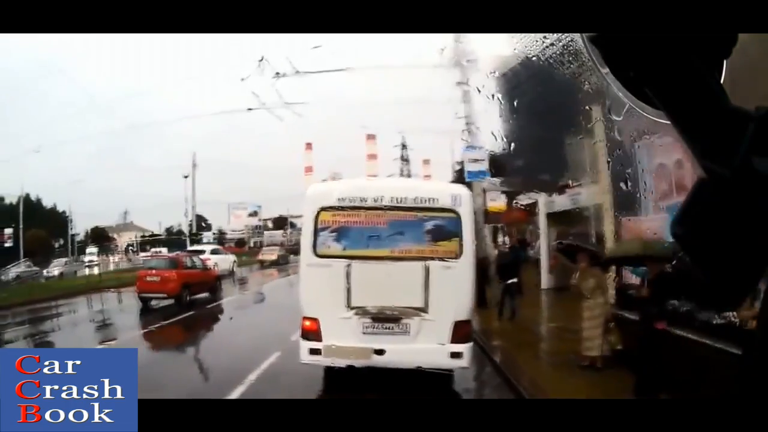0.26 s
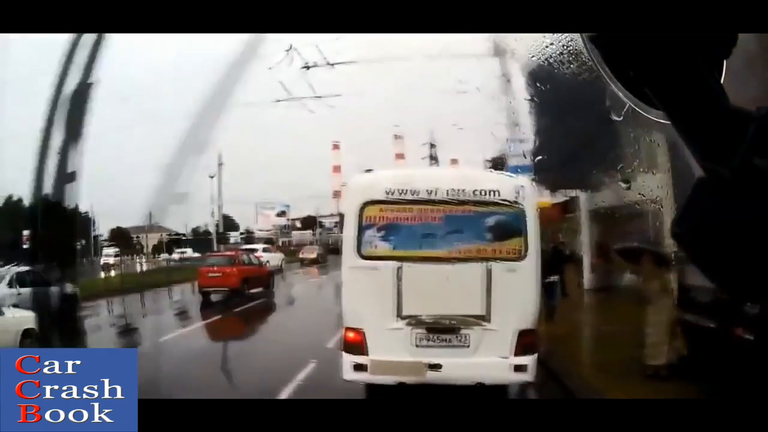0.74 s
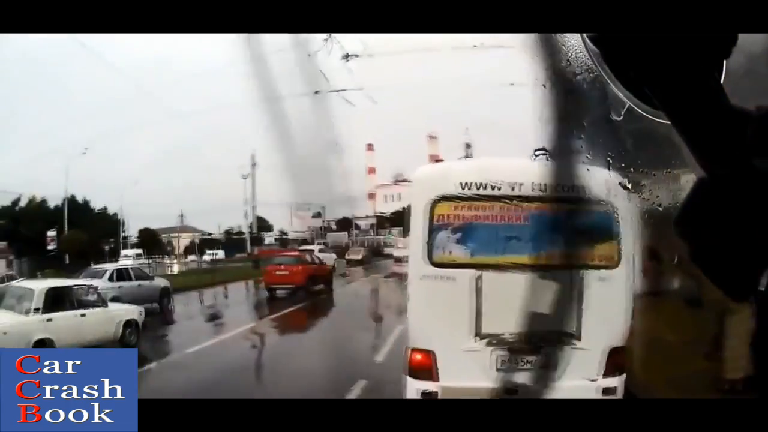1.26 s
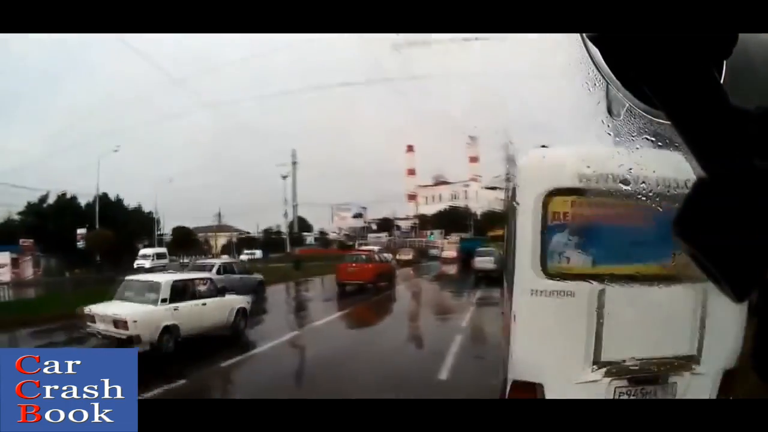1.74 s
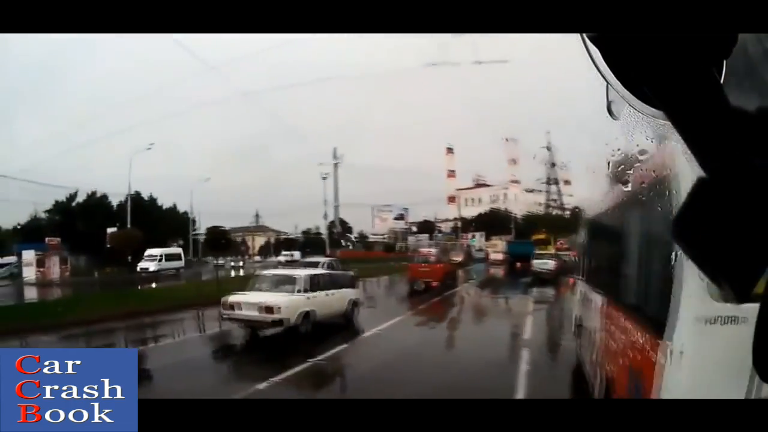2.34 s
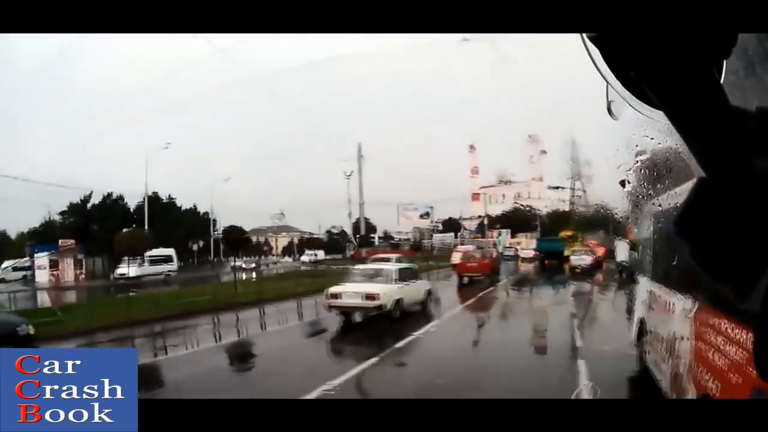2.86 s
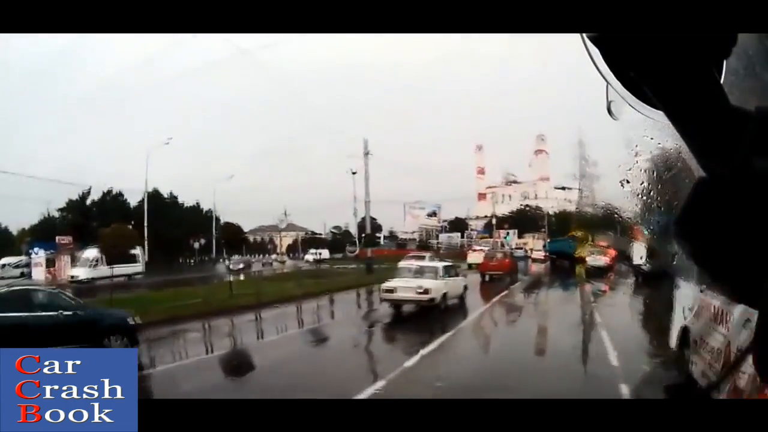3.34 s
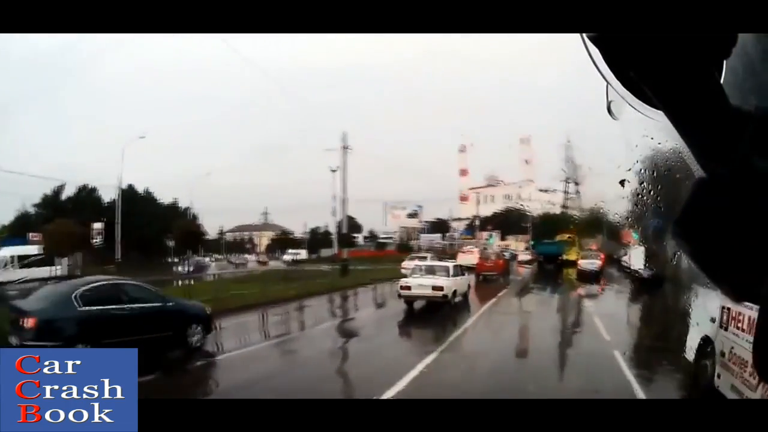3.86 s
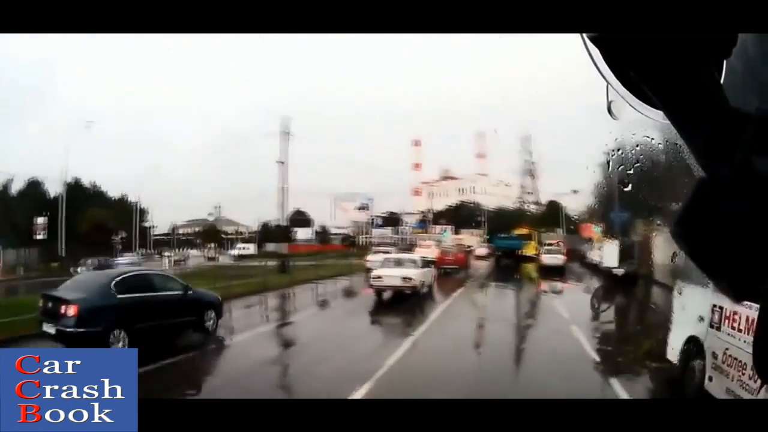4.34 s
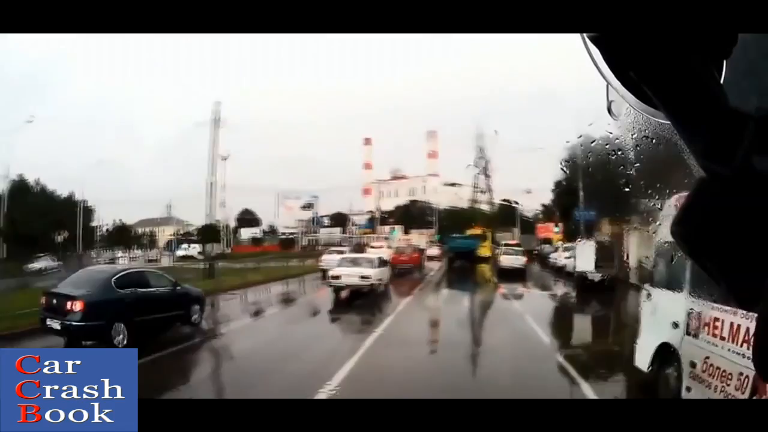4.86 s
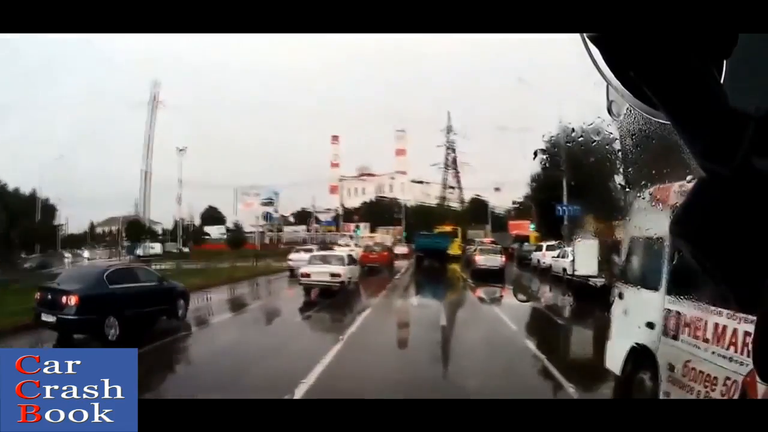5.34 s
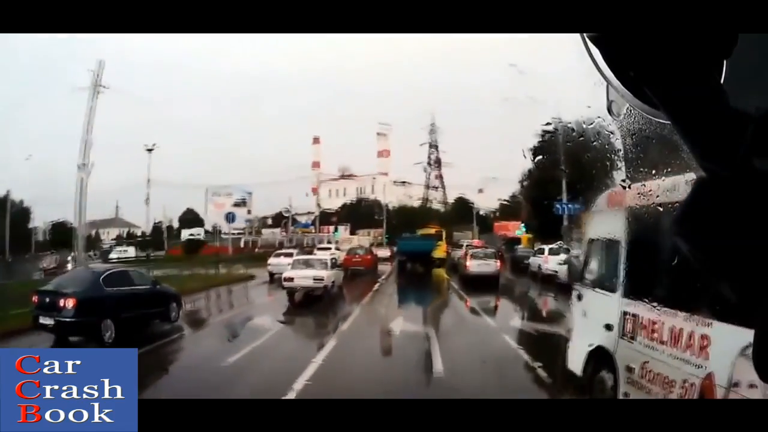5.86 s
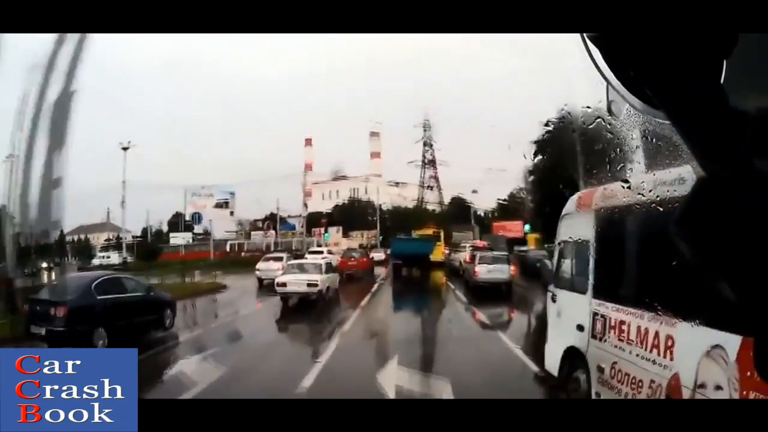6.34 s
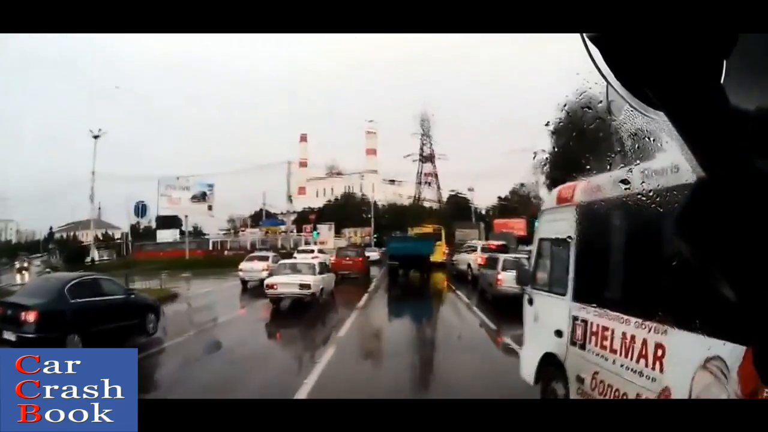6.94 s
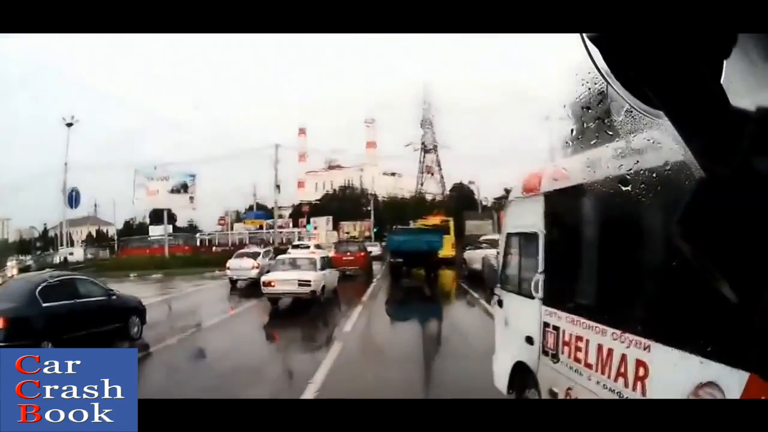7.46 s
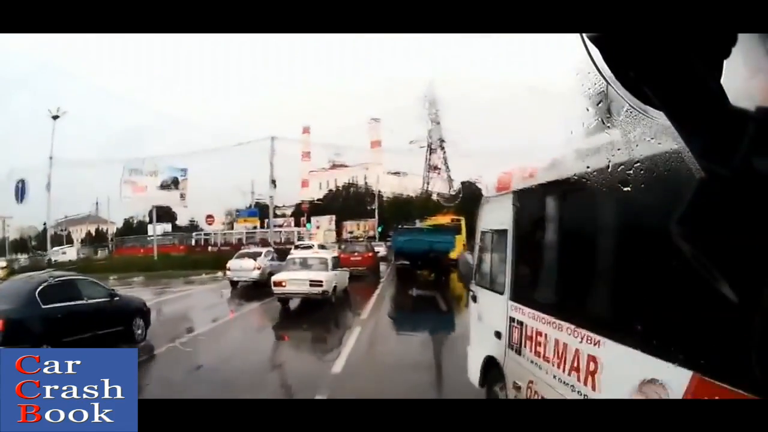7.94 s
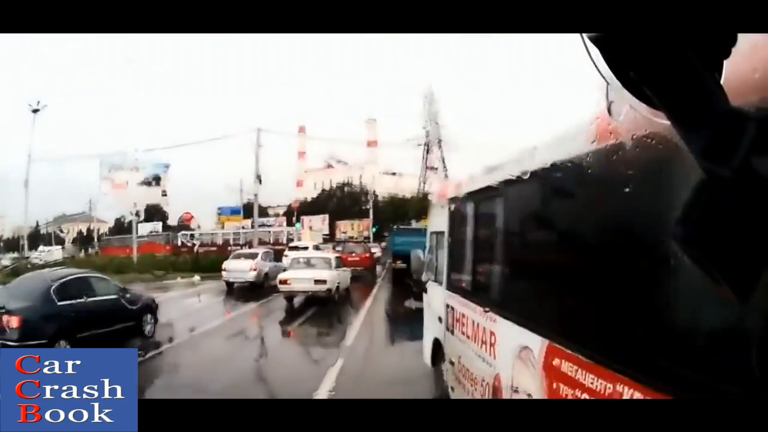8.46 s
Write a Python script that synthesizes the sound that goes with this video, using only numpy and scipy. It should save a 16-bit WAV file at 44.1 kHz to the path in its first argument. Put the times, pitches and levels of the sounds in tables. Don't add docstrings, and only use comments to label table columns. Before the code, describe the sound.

Boomy car cabin on a rainy road: engine climbing and falling, soft splashes and ticks, ending in hard jolts and a long dissonant horn blast.

```python
import sys
import numpy as np
from scipy import signal
from scipy.fft import rfft, irfft, next_fast_len
from scipy.io import wavfile
from scipy.ndimage import uniform_filter1d

SR = 44100
rng = np.random.default_rng(int(sys.argv[2]) if len(sys.argv) > 2 else 0)


def transcribe(u):
    v = np.clip(np.atleast_2d(u).T, -1, 1)
    q = np.round(v * 32767).astype(np.int16)
    wavfile.write(sys.argv[1], SR, q)


def ratio_of_db(decibels):
    return 10 ** (np.asarray(decibels, float) / 20)


N = 384111
T = np.arange(N) / SR


def curves(table):
    s, *columns = np.transpose(table)
    return [np.interp(T, s, c) for c in columns]


def unit(x):
    return x / np.sqrt(np.mean(x ** 2))


def walk(rate):
    k = int(SR / rate)
    steps = np.repeat(rng.standard_normal(N // k + 1), k)
    return unit(uniform_filter1d(uniform_filter1d(steps, k), k)[:N])


def ring(x, hz, width_hz):
    return signal.lfilter(*signal.iirpeak(hz, hz / width_hz, SR), x)


def soften(x, hz, order=2):
    return signal.sosfilt(signal.butter(order, hz, fs=SR, output="sos"), x)


def thin(x, hz):
    return signal.sosfilt(signal.butter(4, hz, "high", fs=SR, output="sos"), x)


def cut_steeply(x, hz, order, ripple_db, depth_db):
    return signal.sosfilt(signal.ellip(order, ripple_db, depth_db, hz, fs=SR, output="sos"), x)


def band(lo_hz, hi_hz, order=3):
    edges = signal.butter(order, [lo_hz, hi_hz], "band", fs=SR, output="sos")
    return unit(signal.sosfilt(edges, rng.standard_normal(N)))


def hiss(tone, flicker_db, rate):
    hz, db = np.transpose(tone)
    n = next_fast_len(N, True)
    f = np.arange(n // 2 + 1) * SR / n + 1
    tilt = ratio_of_db(np.interp(np.log(f), np.log(hz), db, left=-90, right=-90))
    whole = rfft(rng.standard_normal(n)) * tilt
    out, shared = 0, walk(rate)
    for centre in np.arange(2 * np.log2(hz[0]), 2 * np.log2(hz[-1]) + 1):
        part = whole * np.clip(1 - np.abs(2 * np.log2(f) - centre), 0, 1)
        out = out + irfft(part, n)[:N] * ratio_of_db(flicker_db * (shared + 0.21 * walk(rate)))
    return unit(out)


def stack(hz, tones, waver_db, rate, in_step_s=None):
    turn, spread = 2 * np.pi * np.cumsum(hz) / SR, 2 * np.pi
    if in_step_s is not None:
        turn, spread = turn - turn[int(in_step_s * SR)], 0
    partials = (ratio_of_db(db + waver_db * walk(rate)) * np.sin(k * turn + spread * rng.random()) for k, db in tones)
    return np.sqrt(2) * sum(partials)


def strikes(rows):
    out, t = np.zeros(N + SR), T[:SR // 4]
    for s, db, hz, t60, share, width in rows:
        noise = ring(ring(rng.standard_normal(len(t)), hz, hz * width), hz, hz * width)
        knock = np.sin(2 * np.pi * hz * t) + share * unit(noise)
        decay = np.exp(-np.log(1000) * t / t60)
        out[int(s * SR):][:len(t)] += ratio_of_db(db) * knock * decay * np.minimum(t / 0.00027, 1)
    return out[:N]


def hold(start, end, attack, release, depth_db=-30):
    db = depth_db * (np.clip(1 - (T - start) / attack, 0, 1) + np.clip((T - end) / release, 0, 3))
    return ratio_of_db(db) * np.clip((T - start) / .005, 0, 1)


def swells(rows):
    t, rise_share = T[::32], 0.55
    bells = (ratio_of_db(db) * np.exp(-.5 * ((t - s) / spread / np.where(t < s, rise_share, 1)) ** 2)
             for s, db, spread in rows)
    return np.interp(T, t, sum(bells))


# t/s, tyre and air noise level/dB, thrown water level/dB
ROLLING = [(0.0, -42, -61), (0.75, -44, -59), (1.6, -44, -60.5), (1.9, -46, -77), (2.6, -44.5, -72),
           (3.0, -42.5, -57), (3.56, -40.5, -60), (3.78, -39.5, -56), (4.29, -37.5, -54),
           (5.09, -35.5, -57.5), (5.6, -37.5, -58.5), (6.42, -37, -53.5), (6.83, -39, -58),
           (7.34, -42, -55), (7.96, -42.5, -59), (8.56, -37.5, -65), (8.71, -41, -62)]
# f/Hz, level/dB per Hz
RUSH = [(290, 1.5), (500, 1), (620, -3), (671, -3.5), (918, -6), (1130, -11), (2720, -11.5), (3950, -29.5),
        (5200, -46), (6760, -69), (11400, -120)]
# f/Hz, level/dB per Hz
SPRAY = [(2530, -32), (4300, -5), (4980, -2), (6630, 9.5), (7890, 5), (9230, 7.5), (9780, 4.5),
         (11500, -9.5), (12500, -25.5), (16200, -58), (22000, -120)]
# t/s, level/dB, spread/s
SPLASHES = [(0.0, -50, 0.0103), (0.277, -52.5, 0.0091), (0.33, -54.5, 0.033), (0.815, -47.5, 0.033),
            (1.375, -47, 0.0287), (1.43, -54, 0.027), (1.475, -40, .015), (1.52, -46.5, 0.021),
            (2.02, -57, 0.011), (2.07, -56, .02), (2.42, -58, 0.027), (2.66, -57, .015), (2.83, -55, .03),
            (2.98, -56, 0.027), (3.06, -54.5, 0.055), (3.143, -47.5, 0.011), (3.575, -46.5, 0.012),
            (6.05, -48, 0.034), (6.918, -53, .01), (6.965, -52, 0.014)]


def wet():
    rush_db, spray_db = curves(ROLLING)
    splash = swells(SPLASHES)
    rush = hiss(RUSH, flicker_db=0.48, rate=20)
    rush = rush + .5 * ring(rush, 1755, 230) + 0.33 * ring(rush, 2680, 230)
    spray = hiss(SPRAY, flicker_db=1.1, rate=40)
    rush_level = np.hypot(ratio_of_db(rush_db + 0.5), ratio_of_db(4) * splash)
    spray_level = ratio_of_db(-4.0) * np.hypot(ratio_of_db(spray_db), splash)
    return rush_level * rush + spray_level * spray + ratio_of_db(-70.5) * band(5300, 10060)


# t/s, level/dB, spread/s, f/Hz
HUMS = [(0.6, -33, 0.231, 121), (1.13, -33, 0.057, 150), (1.88, -32.5, 0.12, 155.6), (2.4, -39, 0.17, 161),
        (2.75, -36.5, 0.1184, 141.2), (2.9, -29.5, .2, 62), (3.3, -32, 0.053, 118), (3.92, -32, 0.1, 200.5),
        (4.03, -32.5, .09, 370), (4.7, -36, .08, 320), (5.35, -35, .05, 368), (7.49, -33, .05, 603),
        (5.4, -28, 0.053, 138), (6.02, -28.5, 0.04, 155), (6.27, -27.5, 0.09, 121),
        (6.93, -32, 0.046, 140.1), (7.1, -35, 0.13, 178), (7.33, -28, 0.055, 114.4), (8.05, -35, .1, 125.5)]
# t/s, level/dB, spread/s
RUBS = [
    (0.855, -46, 0.0275),
    (1.38, -38.5, 0.029),
    (1.415, -42, .02),
    (1.442, -37.5, .012),
    (1.478, -38, 0.015),
    (1.505, -42.5, .015),
    (1.53, -39, 0.012),
]


def panels():
    hums = 0
    for s, db, spread, hz in HUMS:
        hum = ring(rng.standard_normal(N), hz, 11.74)
        hums = hums + swells([(s, db, spread)]) * unit(soften(hum, 1.98 * hz, order=4))
    rub = band(330, 2470, order=2) * ratio_of_db(3.65 * walk(130))
    rub = rub + 1.9 * ring(rub, 636, 300) + 0.28 * ring(rub, 2400, 300)
    return hums + swells(RUBS) * unit(soften(rub, 3150, order=6))


# f/Hz, width/Hz, level/dB
CABIN = [(50, 41, -11), (121, 19.8, 4), (142.3, 13, 1.5), (230.7, 26.4, 1.5), (320, 58, -1),
         (370.7, 22, -5.5), (500, 92, -32), (800, 600, -34.5)]
# t/s, level/dB, spread/s
SWAYS = [(0.63, -30.5, 0.16), (1.24, -22, .05), (1.42, -19.5, 0.087), (1.87, -27, .1), (2.31, -23.5, 0.055),
         (2.7, -27, 0.19), (3.57, -23, 0.085), (3.8, -25, 0.086), (4.3, -26, 0.19), (4.75, -23, .15),
         (5.05, -23.5, 0.081), (5.5, -19.5, .07), (5.8, -22, 0.11), (6.5, -25, 0.29), (6.86, -19, 0.088),
         (7.8, -23.5, 0.134), (8.5, -22, 0.14)]
# t/s, level/dB, spread/s
BUMPS = [(0.0, -26.5, 0.038), (0.7, -42, 0.13), (2.0, -39, .2), (1.24, -30, 0.033), (1.375, -28.5, 0.047),
         (1.47, -26.5, 0.073), (3.89, -28.5, .04), (4.05, -28, .04), (4.95, -27, .04), (5.38, -32, 0.081),
         (5.6, -27, 0.078), (7.805, -21, 0.044)]
# start t/s, end t/s, level/dB
HEAVE = (7.3, 8.62, -20.5)


def road():
    roll_db = curves(ROLLING)[0] + 40
    shake = np.hypot(ratio_of_db(-30 + roll_db), swells(SWAYS))
    level = np.hypot(ratio_of_db(-30 + 0.84 * roll_db), swells(BUMPS))
    drone = sum(ratio_of_db(db + 1.96 * walk(14)) * unit(ring(rng.standard_normal(N), hz, w)) for hz, w, db in CABIN)
    drone = unit(soften(drone, 3150, order=4))
    boom = band(43.0, 81, order=2)
    start, end, heave_db = HEAVE
    heave = ratio_of_db(heave_db) * hold(start, end, .15, .05) * band(7, 16, order=2)
    return heave + shake * band(16.5, 36.0, order=2) + level * ratio_of_db(-2.5) * (boom + drone)


# t/s, peak level/dB, ring f/Hz, upper ring level/dB, crack level/dB
TICKS = [(1.1069, -36, 980, -49, -60), (1.3608, -35, 1010, -42, -51), (1.464, -37, 1200, -41, -51),
         (1.5242, -35, 1270, -44, -49), (2.1391, -40, 966, -55.5, -67), (2.792, -32, 1382, -30.5, -53.5),
         (3.571, -32, 2250, -33, -49), (3.5805, -30.5, 1906, -32, -50), (3.646, -40, 989, -30.5, -54),
         (4.371, -37, 1640, -43, -55.5), (4.6834, -35, 1376, -47, -57), (5.3772, -33, 1853, -43.5, -52.5),
         (4.7952, -28.5, 800, -43, -56.5), (5.495, -40, 1830, -23, -46), (5.545, -35.5, 1008, -35, -50.5),
         (5.9204, -35, 903, -27.5, -57), (6.7045, -44, 1084, -41.5, -71), (6.826, -45, 900, -39, -59),
         (6.9588, -29, 1720, -29.5, -46), (7.0688, -31, 1640, -34, -48.5), (7.3528, -29, 1110, -24, -40.5),
         (7.421, -35, 1851, -36, -43)]
# t/s, peak level/dB
DROPS = [(0.8639, -35), (2.9637, -39), (3.1443, -39), (3.6514, -39), (4.0642, -42), (4.3385, -37),
         (4.575, -44), (4.6357, -40), (4.6478, -40), (5.0335, -42), (5.0619, -41), (5.1821, -41),
         (5.2155, -39), (5.5712, -37), (5.6575, -40), (5.7428, -44), (6.0242, -39), (6.1903, -42),
         (6.2262, -39), (6.2734, -43), (6.4298, -38), (6.9142, -37.5), (7.0579, -36)]
# t/s, peak level/dB, ring f/Hz, t60/s
THUDS = [(1.362, -11, 123, 0.21), (1.401, -11.5, 109.2, 0.064), (1.429, -17, 102, 0.145),
         (1.467, -14.5, 100, 0.21), (1.499, -15, 127, 0.163), (1.527, -18, 133, 0.2),
         (3.88, -13, 129, 0.087), (4.698, -25, 102, 0.043), (5.54, -17, 250, 0.127),
         (5.948, -19, 226.2, 0.29), (6.674, -16.5, 226.6, 0.12), (7.806, -6.5, 115.5, 0.13),
         (8.402, -17, 167.5, 0.16), (8.505, -6, 152.3, 0.125), (8.53, -9.5, 170, 0.088),
         (8.555, -5.5, 150, 0.14), (8.578, -11, 150, 0.119)]
# t/s, peak level/dB, ring f/Hz, t60/s
KNOCKS = [(1.11, -22, 210, 0.13), (1.372, -24, 303, 0.074), (1.39, -31, 600, .07), (1.441, -25, 604, 0.06),
          (1.465, -27, 700, 0.047), (1.507, -28, 500, .07), (1.489, -26, 454, 0.16),
          (7.354, -11.5, 337.7, 0.06), (7.433, -18.5, 458, 0.06), (7.438, -13.5, 353, 0.19),
          (7.688, -4, 346, 0.037), (7.787, -11, 461, 0.049), (8.469, -5.5, 313, 0.078),
          (8.486, -9.5, 395.5, 0.066), (8.508, -10, 221, 0.062), (8.582, -13.5, 326, 0.051)]


def knocks():
    ticks = [(s, db, hz, .065, 1.7, .55) for s, db, hz, *_ in TICKS]
    pings = [(s, db, 2700, .05, .5, .25) for s, _, _, db, _ in TICKS]
    drops = [(s, db - 19) for s, db in DROPS]
    cracks = [(s, db, 7000, .035, 6.0, .9) for s, *_, db in TICKS + drops]
    thuds = [(s, db - 3.5, hz, t60, .8, .9) for s, db, hz, t60 in THUDS + KNOCKS]
    trim = soften(ratio_of_db(-6.5) * strikes(ticks) + ratio_of_db(-4.0) * strikes(pings), 3200, order=4)
    return trim + soften(ratio_of_db(-13.5) * strikes(cracks), 11000, order=4) + soften(strikes(thuds), 1200)


# start t/s, end t/s, level/dB, attack/s, release/s
BUZZ = (7.5, 8.5, -41.5, 0.18, 0.08)
# f/Hz, level/dB per Hz
BUZZ_TONE = [(1760, 6), (3000, 3), (3210, -4), (4950, -16), (6240, -21), (7780, -23), (9520, -22),
             (11600, -34), (12900, -50), (16800, -77), (22000, -120)]
# t/s, level/dB, spread/s, sizzle above it/dB
JOLTS = [(7.357, -39.5, 0.0093, -4), (7.392, -49.5, 0.023, 2), (7.425, -48, 0.014, 1),
         (7.455, -48, .008, 1), (7.51, -47.5, .008, 4), (7.56, -44.5, 0.013, 5), (7.615, -42.5, 0.013, 3),
         (7.72, -40.5, 0.017, -2), (7.797, -40, 0.023, -5), (8.409, -43.5, .02, 4), (8.472, -34, 0.011, -4),
         (8.492, -40, 0.0055, 7), (8.512, -29.5, 0.0193, 3), (8.537, -35, 0.011, 8), (8.566, -33, 0.015, 6),
         (8.599, -48.5, 0.017, 8.5), (8.697, -48.5, 0.013, 2)]
HORN_HZ = 419.15, 384.1, 458.7


def rough_buzz(blare):
    start, end, db, attack, release = BUZZ
    buzz = ratio_of_db(db) * hold(start, end, attack, release, depth_db=-13.5)
    jolt = swells([row[:3] for row in JOLTS])
    sizzle = ratio_of_db(-2) * buzz + swells([(s, level + up, spread) for s, level, spread, up in JOLTS])
    middle = ratio_of_db(8 + db) * hold(start, end, attack, 0.16, depth_db=-12.0) + ratio_of_db(11.5) * jolt
    thump = ratio_of_db(-1) * buzz + ratio_of_db(0.5) * jolt

    beat = soften(np.abs(soften(blare, 540)), 150)
    beat = beat / (uniform_filter1d(beat, size=4000) + 0.005)
    stroke = 1 + .3 * np.cos(2 * np.pi * HORN_HZ[0] * T)
    chatter = unit(np.exp(1.1 * np.tanh(1.5 * walk(340))) * (1.2 + beat) * stroke)

    tone = hiss(BUZZ_TONE, flicker_db=0.4, rate=62)
    top = unit(thin(tone, 6000))
    slap = soften(tone, 8100, order=4)
    slap = unit(slap + ring(slap, 5100, 900))
    bright = (buzz + jolt) * slap * chatter + sizzle * ratio_of_db(walk(70)) * top * chatter ** 0.3
    body = middle * chatter ** 0.35 * band(450, 2817, order=5)
    return bright + body + thump * ratio_of_db(2.6 * walk(40)) * band(94.3, 560)


# start t/s, end t/s, strongest partial level/dB, swell/dB per s, fundamental level/dB
HORNS = [
    (7.415, 8.575, -23, 7, -25.5),
    (7.42, 8.58, -25.5, -4, -33.5),
    (7.41, 8.245, -20.5, -4.5, -22),
]
# multiple, level/dB to the strongest partial
MID_TONES = [(2, -23), (3, -31.5), (4, -23.5), (5, -20.5), (6, 0.5), (7, -20), (8, -35), (9, -40.5),
             (10, -44), (11, -43), (12, -45), (13, -45), (14, -44), (15, -43), (16, -42.5), (18, -40),
             (22, -40)]
LOW_TONES = [(2, -7), (3, -8.5), (4, -0.5), (5, -6.5), (6, -9.5), (7, -12), (8, -32)]
HIGH_TONES = [(2, -12.5), (3, -24), (4, -10.5), (5, -25), (6, -32), (7, -34), (11, -39), (12, -43)]
HUM_SWELL = 0.5, 0, -2.5
HUM_RINGS_ON = .05, .05, 0
# first stir t/s, catch t/s, end t/s, f/Hz, level/dB
TOOT = (8.0, 8.255, 8.585, 305.5, -18.5)


def horns():
    out = 0
    all_tones = MID_TONES, LOW_TONES, HIGH_TONES
    for row, hz, tones, hum_swell, rings_on in zip(HORNS, HORN_HZ, all_tones, HUM_SWELL, HUM_RINGS_ON):
        start, end, db, swell, low_db = row
        hz = hz * (1 + .0005 * walk(15))
        late_fade_db = -1.5 * (swell < 0) * np.clip((T - 8.33) / 0.13, 0, 1)
        swell_db = swell * np.minimum(T - start, 0.647) + late_fade_db
        hum_db = low_db + hum_swell * (T - start).clip(0)
        blare = ratio_of_db(db + swell_db) * stack(hz, tones, waver_db=1.41, rate=25)
        hum = ratio_of_db(hum_db) * stack(hz, [(1, 0)], waver_db=1.8, rate=14, in_step_s=7.484)
        out = out + blare * hold(start, end, 0.046, 0.073) + hum * hold(start, end + rings_on, 0.014, 0.067)
    return out + toot()


def toot():
    stir, catch, end, hz, db = TOOT
    early, late = np.minimum(T - catch, 0), np.maximum(T - catch, 0)
    hz = np.maximum(hz + 24 * early, 290) - 5 * late
    db = db + 55 * early - 5 * late + 7 * np.clip(early / 0.017, -1, 0)
    tone = stack(hz, [(1, 0), (1.5, -13), (4, -24)], waver_db=.7, rate=20)
    octave = ratio_of_db(-6 - 18 * late) * stack(hz, [(2, 0)], waver_db=3.5, rate=24)
    return ratio_of_db(db) * (tone + octave) * hold(stir, end, .012, .025)


# t/s, firing rate f/Hz, load level/dB
ENGINE = [(0.0, 24.12, -2.5), (2.45, 26.5, -9.5), (3.37, 42.77, -1), (3.66, 50.0, -13), (3.81, 54.16, 0),
          (4.5, 72.8, -5), (5.0, 87.44, 0), (5.29, 90.94, -5), (5.5, 84, -6), (5.7, 72.8, -13),
          (5.85, 68.94, -4), (6.07, 55.58, 0.5), (6.22, 59.47, -5), (6.67, 64.53, -3), (6.86, 64.36, -12),
          (7.0, 62.4, -4.5), (7.78, 51.45, 2), (8.71, 25, 0.5)]
# multiple of the firing rate, level/dB
GROWL = [(1.5, 1), (2.5, -3.5), (3, 1), (3.5, -1), (4, -2.5), (4.5, -11), (5, 5), (5.5, 0), (6, 2),
         (6.5, -7), (7, 2), (8, -1), (9, -2), (10, -2.5)]
# t/s, level/dB, spread/s
SNARLS = [
    (3.95, -1, 0.15),
    (4.5, -3, 0.14),
    (5.0, 1.5, 0.38),
    (5.45, 4.5, 0.22),
    (6.3, -4, 0.19),
    (7.05, -3.5, 0.125),
]
# f/Hz, level/dB
BOOM = [(24, -2), (40, -0.5), (55, 0.5), (88, -0.5), (105, -4), (121, 5), (150, -4), (180, -5.5)]
# f/Hz, level/dB
OCTAVE_BOOM = [(48, 0), (62, -1.5), (82, -7.5), (105, -6), (121, 6), (150, -6.5), (180, -2)]


def cabin_answer(hz, table):
    f, db = np.transpose(table)
    return np.interp(np.log(hz), np.log(f), db)


def cabin_growl(growl):
    rings = 1.44 * ring(ring(growl, 459, 110), 459, 110) + 1.21 * ring(growl, 608, 90)
    panel_rings = sum(ratio_of_db(db + 3.5) * ring(growl, f, w) for f, w, db in CABIN[3:])
    growl = 0.54 * soften(growl, 603, order=4) + rings + panel_rings
    return cut_steeply(growl, 650, order=6, ripple_db=1, depth_db=30)


def engine():
    hz, load_db = curves(ENGINE)
    coast_db = -12 * np.clip((T - 7.85) / 0.108, 0, 1)
    tall_gear_db = -9.5 * np.clip((T - 4.25) / 0.1484, 0, 1)
    tone_db = -19.5 + load_db + cabin_answer(hz, BOOM) + 0.84 * coast_db
    octave_db = -27.5 + load_db + cabin_answer(2 * hz, OCTAVE_BOOM) + tall_gear_db
    third_db = -41 + load_db / 2 + cabin_answer(3 * hz, BOOM) / 2 + coast_db
    growl_db = -50 + 0.14 * load_db + 1.5 * np.log2(hz / 60) + coast_db

    hz = hz * (1 + 0.00379 * walk(11))
    tone = ratio_of_db(tone_db) * stack(hz, [(1, 0)], waver_db=0.6, rate=29)
    octave = ratio_of_db(octave_db) * stack(hz, [(2, 0)], waver_db=2.5, rate=11)
    third = ratio_of_db(third_db) * stack(hz, [(3, 0)], waver_db=3.5, rate=8)
    growl = cabin_growl(stack(hz, GROWL, waver_db=2.2, rate=6))
    return tone + octave + third + ratio_of_db(growl_db) * (1 + swells(SNARLS)) * growl


def scene():
    blare = horns()
    loud = uniform_filter1d(np.abs(blare), size=4600, origin=1900)
    duck = 1 / (1 + 30 * loud)
    return (duck * wet() + panels() + road() + knocks() + rough_buzz(blare) + blare + engine())[None]


def band_limit(x):
    return signal.sosfilt(signal.butter(12, 13070, fs=SR, output="sos"), x)


# t/s, length/ms
CHOKES = [(1.3566, 3.1), (1.5046, 0.99), (4.0317, 2.52), (4.0936, 4), (4.7416, 3.2), (4.762, 2.7),
          (4.78, 1.6), (4.7906, 3.9), (4.8102, 2.7), (6.0593, 1.58), (6.725, 5.6), (6.7471, 6.27),
          (6.8126, 11), (6.8434, 8.1), (6.872, 3.0), (6.9066, 3.1), (7.7527, 1.7)]


def record(dry):
    choked = sum(1. * (T > s) * (T < s + ms / 1000) for s, ms in CHOKES)
    choked = uniform_filter1d(np.minimum(choked, 1), size=20)
    slow = signal.sosfiltfilt(signal.butter(2, 90, fs=SR, output="sos"), dry)
    x = 1.115 * dry + 1.12 * (slow - dry) * choked
    rail, knee = .34, 11
    x = x / (1 + np.abs(x / rail) ** knee) ** (1 / knee)
    mix = cut_steeply(thin(x, 22), 12500, order=8, ripple_db=.2, depth_db=60)
    return band_limit(mix)


dry = scene()
out = record(dry)
transcribe(out)
```